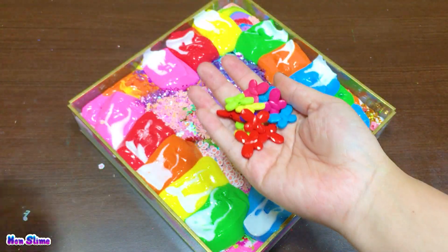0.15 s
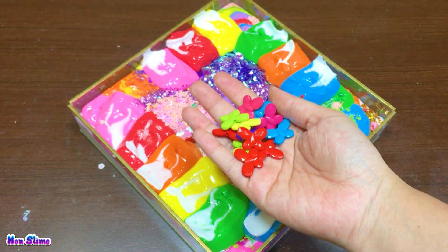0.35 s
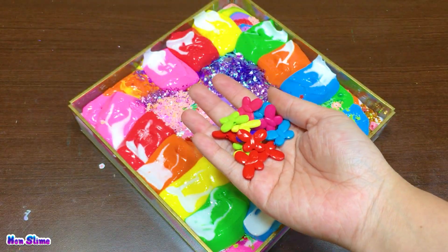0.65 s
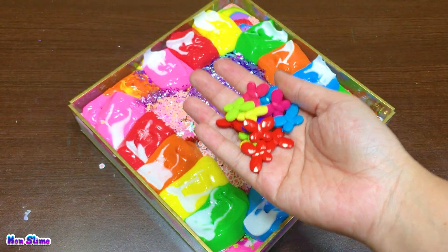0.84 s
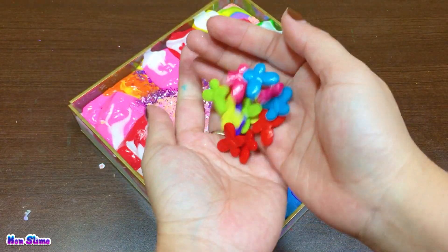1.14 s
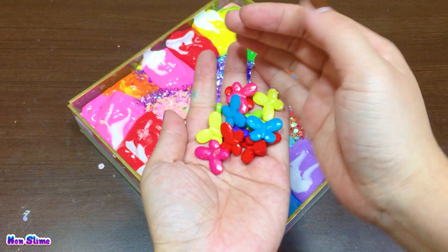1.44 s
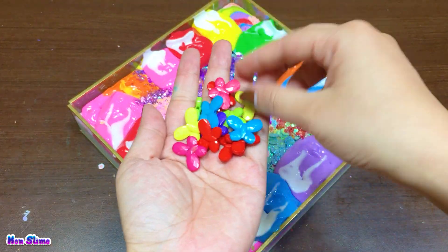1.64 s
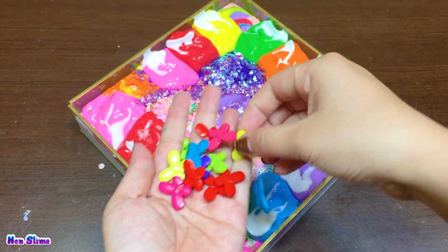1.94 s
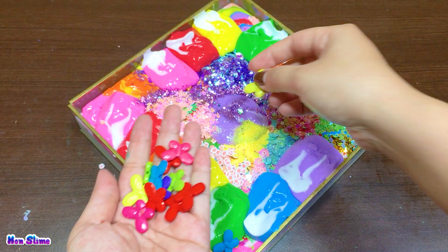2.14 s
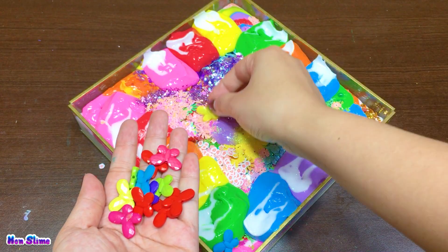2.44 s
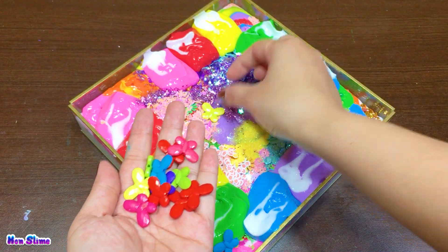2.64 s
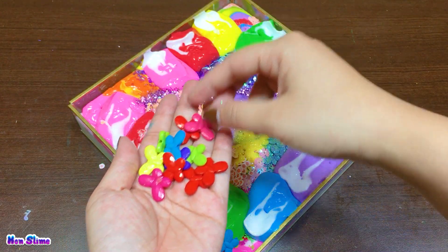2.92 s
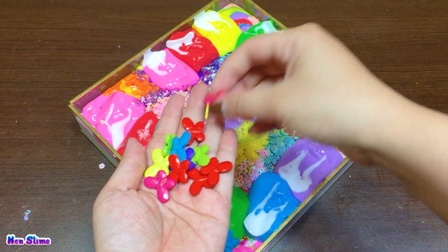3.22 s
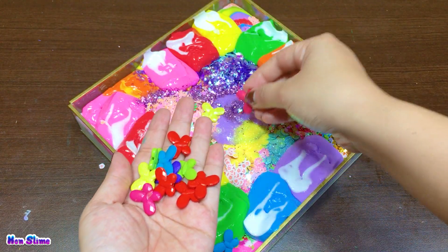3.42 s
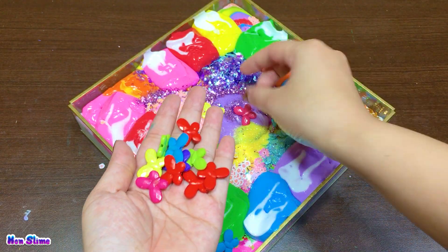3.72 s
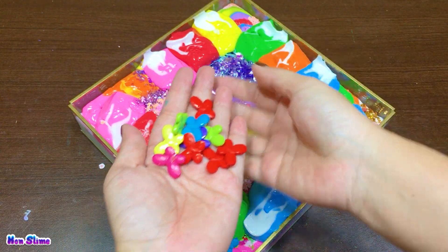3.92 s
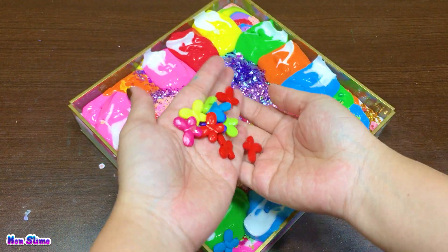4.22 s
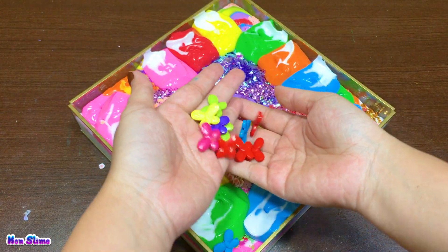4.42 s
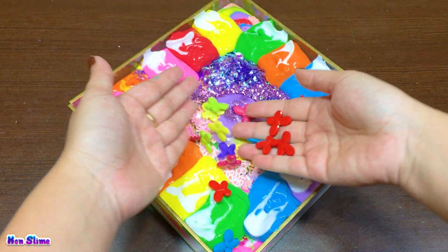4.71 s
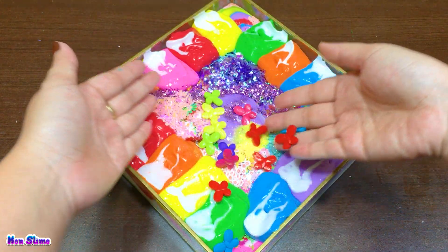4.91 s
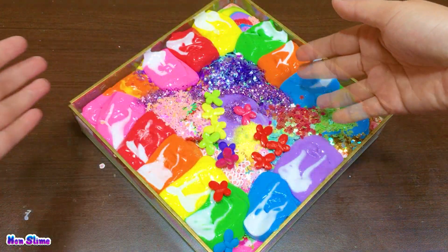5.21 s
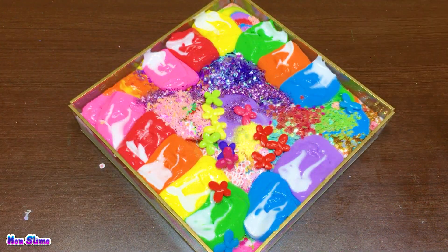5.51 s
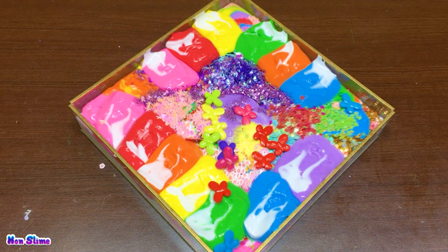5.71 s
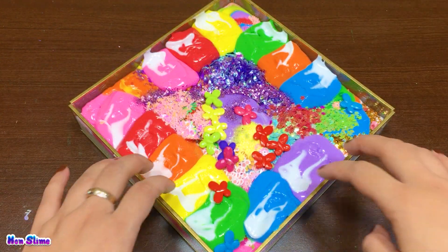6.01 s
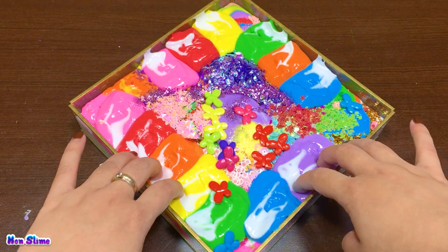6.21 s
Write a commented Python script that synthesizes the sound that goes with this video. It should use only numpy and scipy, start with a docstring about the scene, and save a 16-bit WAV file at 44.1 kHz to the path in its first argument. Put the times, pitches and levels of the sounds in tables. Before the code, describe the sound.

Close up, a jar thumps on wood, bright beads clatter in hands, a tray clacks sharply, and beads patter down into slime.

```python
"""Plastic beads, a jar and slime

A plastic jar slides and is knocked down on a wooden table beside a tray of slime: scrapes, damped rings and thumps.
Plastic butterfly beads are tipped from palm to palm, picked out one by one and poured onto the slime:
short ringing clicks, a dense patter and sticky pops. One sharp clack of the tray rings out.
A soft hiss swells slowly and drops off quickly, and hands rumble dully as they shift, both as shaped noise,
in a small room with a wavering hum."""
import sys
import numpy as np
from scipy import signal
from scipy.fft import rfft, irfft, next_fast_len
from scipy.io import wavfile
from scipy.ndimage import map_coordinates

SR = 44100
rng = np.random.default_rng(int(sys.argv[2]) if len(sys.argv) > 2 else 0)


def to_wav(s):
    """Save 16-bit WAV."""
    ch = np.atleast_2d(s).T  # columns
    pcm = np.round(np.clip(ch, -1, 1) * 32767)  # PCM
    wavfile.write(sys.argv[1], SR, pcm.astype(np.int16))


N = 280035  # length in samples

# Colour of the room tone. Each row: frequency in Hz, relative density in dB per Hz.
AIR_COLOUR = [(20, -31), (32, -15.5), (50, 3), (80, -8.5), (120, -7), (170, -8), (215, 1), (270, -9),
              (320, -5.5), (490, -17), (1100, -26), (2000, -27), (6200, -31), (16000, -39.5)]
# Hum of a fan. Each row: frequency in Hz, level in dB before the trim in room_tone().
FAN_HUM = [(53.8, -69), (107.7, -70.5), (161.5, -69), (209.9, -72), (317.6, -71.5)]
# How long the room rings. Each row: frequency in Hz, time to fall 60 dB in seconds.
ROOM_DECAY = [(120, .4), (350, 0.429), (650, 0.28), (1200, 0.3), (3000, 0.11), (8000, 0.098), (16000, 0.27)]

# Soft hiss that swells and drops off. Each row: start in seconds, hold in seconds, level in dB before the lift in hiss().
HISS_SWELLS = [(1.22, .5, -61), (3.92, .6, -73.5), (4.66, .58, -63), (5.84, .26, -73), (6.15, .2, -66.5)]
# Colour of that hiss. Each row: frequency in Hz, relative density in dB per Hz.
HISS_COLOUR = [(200, -3), (600, 2), (2000, 0.5), (4000, -1), (8000, -4), (15000, -11)]
# Dull rumble as the hands shift and grip the tray. Each row: start in seconds, hold in seconds, level in dB.
HAND_LEANS = [(4.75, 0.43, -57.5), (5.88, 0.73, -57)]
# Colour of that rumble. Each row: frequency in Hz, relative density in dB per Hz.
RUMBLE_COLOUR = [(30, -7), (80, -5.5), (115, 0), (170, -1.5), (240, -5.5), (350, -27), (600, -37),
                 (2000, -67)]

# Beads are pressed into the slime. Each row: start in seconds, hold in seconds, level in dB.
SLIME_PRESSES = [(2.52, 0.11, -63.5), (3.71, 0.0085, -61.5)]
# A bead drops into soft slime. One row: start in seconds, peak in dB, pitch in Hz.
SLIME_PLOP = (4.968, -40, 2120)

# Hard plastic clacks on the tray. Each row: start in seconds, level in dB before the balance of tone and snap.
TRAY_CLACKS = [(2.109, -13), (5.321, -42), (5.6505, -42.5), (6.329, -45)]
# Modes of the tray. Each row: frequency in Hz, relative level in dB, time to fall 60 dB in seconds.
TRAY_MODES = [(1450, -4.5, 0.0067), (2120, 9.5, 0.0046), (3340, -25, 0.0019)]
# Filter for a clack's noisy part. Each row: frequency in Hz, gain in dB.
SNAP_COLOUR = [(50, -30.5), (170, -1), (450, -10), (750, -10.5), (1400, -6), (2600, 0), (4200, 1),
               (5200, -6), (7000, -3.5), (11000, -15), (16000, -19)]

# The jar meets the table. Each row: start in seconds, ring pitch in Hz, ring's time to fall 60 dB in seconds,
# ring peak in dB, table peak in dB, crack peak in dB before its filter.
JAR_KNOCKS = [(0.4891, 1131, 0.0074, 0.5, -17, 4), (.495, 1056, 0.015, -9, -30.5, -20),
              (0.6473, 1008, 0.035, -20.5, -29, -20), (0.7212, 1260, 0.0027, -16, -16, -9.5),
              (0.7362, 1130, 0.0086, -18, -34, -21)]
# Modes of the wooden table. Each row: frequency in Hz, relative level in dB, time to fall 60 dB in seconds.
TABLE_MODES = [(116, -28, 0.22), (254, -23, .05), (402, -7, .025), (600.6, 1.5, 0.022), (706, -6, 0.017)]
# Filter for the jar's crack. Each row: frequency in Hz, gain in dB.
SHELL_COLOUR = [(60, -24), (300, -12.5), (600, -4), (1200, -6.5), (1750, 6), (2200, -5), (4500, -12.5),
                (7000, -22), (16000, -36.5)]
# The jar is pushed over the table. Each row: start in seconds, hold in seconds, level in dB before its flutter.
JAR_SLIDES = [(.15, 0.086, -58.5), (.32, .06, -65), (.44, 0.032, -51.5)]
# Colour of the scrape. Each row: frequency in Hz, relative density in dB per Hz.
SCRAPE_COLOUR = [(300, -25.5), (900, -9.5), (1550, 0), (2100, -12), (3000, -18), (5500, -14.5), (9000, -23),
                 (16000, -31)]

# Bead against bead, the clearest contacts. Each row: time in seconds (the click follows 1 ms later),
# nominal peak in dB before the bass cut, nominal pitch in Hz of the mode struck hardest.
BEAD_CLICKS = [(0.7885, -38.5, 7440), (1.1134, -29, 15050), (1.1607, -21, 7190), (1.2069, -16.5, 15200),
               (1.2419, -8, 15000), (1.2473, -4.5, 15100), (1.2556, -13, 10600), (1.28, -13, 15000),
               (1.3171, -9, 10600), (1.3418, -14, 6150), (1.3559, -7.5, 15200), (1.3893, -28, 11600),
               (1.4197, -23, 11100), (1.5463, -35, 12300), (1.7834, -22.5, 15100), (1.8179, -30, 9250),
               (1.8252, -21, 15400), (1.8605, -33, 7030), (1.9784, -34.5, 6600), (2.0033, -20.5, 15150),
               (2.0647, -24.5, 10660), (2.6365, -43.5, 15310), (2.9926, -34, 6900), (3.1757, -47.5, 15300),
               (4.1628, -38, 9680), (4.321, -32, 11100), (4.4304, -20.5, 15350), (4.4709, -19.5, 10000),
               (4.4974, -24, 6010), (4.5227, -22.5, 7100), (4.556, -19, 8750), (4.5874, -16.5, 10570),
               (4.6332, -16.5, 15400), (4.6398, -16.5, 15800), (4.6476, -19, 15300), (4.6683, -11, 14300),
               (4.681, -21.5, 15200), (4.7007, -19, 15300), (4.7396, -18.5, 14800), (4.7661, -22.5, 14900),
               (4.809, -24, 15000), (4.8657, -16, 15100), (4.9477, -26, 12000), (5.0442, -28.5, 10500)]
# Modes of a bead. Each row: frequency in Hz, relative level in dB, time to fall 60 dB in seconds.
BEAD_MODES = [(3460, -15.5, 0.005), (6210, -7.5, 0.0018), (7280, 0, 0.0025), (9520, 9, 0.0013),
              (11230, 0.5, 0.0033), (12300, -24.5, 0.0026), (14760, -2.5, 0.0048)]
# Beads shift and tumble in the palm. Each row: start in seconds, hold in seconds, level in dB before the lift in beads().
BEAD_JOSTLES = [(1.15, 0.062, -49), (1.245, 0.12, -32), (1.77, .29, -64.5), (3.94, .28, -76),
                (4.38, .04, -58), (4.45, 0.18, -45), (4.66, 0.036, -50.5), (4.74, 0.035, -52),
                (4.81, 0.1, -59.5)]

PATTER_RANGE_DB = 28  # spread between the strongest and the weakest small contacts
REBOUND_GAP_S = (0.0011, 0.006)  # shortest and longest step between rebounds, counted from the listed time
REBOUND_FIRST_DB, REBOUND_LOSS_DB = -8, 4.5  # first rebound against the listed peak; loss at each further one
# The room's low notes build up late after a thump on the table.
BOOM_BAND_HZ, BOOM_DB, BOOM_BUILD_S = (180, 350), -5.5, 0.046
TOP_HZ = 16100  # the recorder's band limit


def amp(db):
    """Decibels to gain."""
    return 10 ** (np.asarray(db) / 20)


def unit(x):
    """x at rms 1."""
    return x / np.sqrt(np.mean(x ** 2) + 1e-20)


def along(points, hz):
    """Values between (Hz, value) points on a log axis."""
    f, v = np.transpose(points)
    return np.interp(np.log(hz + 1), np.log(f + 1), v)


def swell(strokes, attack_s, release_s):
    """Gain per sample: each stroke gains 20 dB per attack_s, holds, and loses 20 dB per release_s."""
    t = np.arange(N) / SR
    levels = []
    for s, hold, db in strokes:
        rising = (s - t) / attack_s
        falling = (t - s - hold) / release_s
        levels.append(db - 20 * np.maximum(np.maximum(rising, falling), 0))
    loudest = np.max(levels, axis=0)
    return amp(np.maximum(loudest, -140))


def wobble(rate):
    """A smooth random curve, rate knots a second."""
    knots = rng.standard_normal(int(N * rate / SR) + 4)
    return map_coordinates(knots, [np.arange(N) * rate / SR])


def filtered(x, response):
    """x times a response of frequency."""
    m = next_fast_len(N + 8192)
    spectrum = rfft(x, m) * response(np.fft.rfftfreq(m, 1 / SR))
    return irfft(spectrum, m)[:N]


def coloured(x, colour):
    """x through a filter drawn in dB over Hz."""
    return filtered(x, lambda hz: amp(along(colour, hz)))


def noise(colour):
    """Coloured noise of rms 1."""
    return unit(coloured(rng.standard_normal(N), colour))


def add(track, s, sound):
    """Mix a sound into the track at time s."""
    start = int(np.clip(round(s * SR), 0, N - 1))
    track[start:start + len(sound)] += sound[:N - start]


def ring(modes, t, attack, scatter_db, detune):
    """Damped modes with peak 1; scatter_db and detune vary their levels and pitches at random."""
    hz, db, t60 = np.transpose(modes)[:, :, None]
    strength, shift = rng.standard_normal((2, len(modes), 1))
    decay = amp(db + scatter_db * strength - 60 * t / t60)
    waves = decay * np.sin(2 * np.pi * hz * np.exp(detune * shift) * t)
    sound = waves.sum(0) * (1 - np.exp(-t / attack))
    return sound / np.abs(sound).max()


def crack(t, t60):
    """The noisy instant of contact, with peak 1."""
    burst = rng.standard_normal(len(t)) * amp(-60 * t / t60)
    return burst / np.abs(burst).max()


def room(x, gap):
    """The room's answer: a noise tail that fades in over the gap, each band dying at its own rate."""
    hz, t, z = signal.stft(rng.standard_normal(SR // 2), SR, nperseg=256)
    decay = amp(-60 * t / along(ROOM_DECAY, hz)[:, None])
    tail = signal.istft(z * decay, SR, nperseg=256)[1]
    tail = tail * (1 - np.exp(-(np.arange(len(tail)) / SR / gap) ** 2))
    return signal.fftconvolve(x, tail / np.linalg.norm(tail))[:N]


def room_tone():
    """Low rumble and faint hiss from shaped noise, and a fan hum of sines unsteady in level and phase."""
    t = np.arange(N) / SR
    hum = np.zeros(N)
    for hz, db in FAN_HUM:
        level = amp(db + 1.1 * wobble(3.087)) * np.sqrt(2)  # a sine peaks 3 dB over its rms
        hum += level * np.sin(2 * np.pi * hz * t + 0.82 * wobble(7.4))
    return amp(-60.0) * noise(AIR_COLOUR) + amp(-1.5) * hum


def hiss():
    """A soft, slightly fluttering hiss of shaped noise that swells slowly and drops off quickly."""
    flutter = amp(0.7 * wobble(25))
    return amp(2.5) * swell(HISS_SWELLS, attack_s=0.4, release_s=0.062) * noise(HISS_COLOUR) * flutter


def hands():
    """A dull rumble of shaped noise as the hands shift and grip the tray."""
    return swell(HAND_LEANS, attack_s=0.21, release_s=0.22) * noise(RUMBLE_COLOUR)


def slime():
    """Tiny sticky pops, random impulses where beads are pressed in, and one soft plop, a short damped tone."""
    pops = rng.standard_normal(N) * (rng.random(N) < 700 / SR)  # about 700 a second
    pops = unit(coloured(pops, [(1000, -26.0), (6000, -11), (16000, -10)]))
    out = swell(SLIME_PRESSES, attack_s=0.063, release_s=0.035) * pops
    s, db, hz = SLIME_PLOP
    t = np.arange(SR // 16) / SR
    add(out, s, amp(db) * ring([(hz, 0, 0.012)], t, attack=0.0021, scatter_db=0, detune=0))
    return out


def tray():
    """Sharp clacks of stiff plastic: damped modes and a noisy snap that carries into the room."""
    tone, snap = np.zeros((2, N))
    t = np.arange(SR // 16) / SR
    for s, db in TRAY_CLACKS:
        add(tone, s, amp(db - 11) * ring(TRAY_MODES, t, attack=0.0008, scatter_db=2.5, detune=0.034))
        add(snap, s, amp(db + 6.5) * crack(t, t60=0.019))
    snap = coloured(snap, SNAP_COLOUR)
    return tone + snap + amp(-9.5) * room(snap, gap=0.0065)


def jar():
    """The jar scrapes along, lands, rocks and settles; pitch depends on where it touches, each blow thumps the table."""
    shell, cracks, wood = np.zeros((3, N))
    t = np.arange(SR // 4) / SR
    for s, hz, t60, ring_db, table_db, crack_db in JAR_KNOCKS:
        add(shell, s, amp(ring_db) * ring([(hz, 0, t60)], t, attack=0.0012, scatter_db=0, detune=0))
        add(cracks, s, amp(crack_db) * crack(t, t60=0.014))
        add(wood, s, amp(table_db) * ring(TABLE_MODES, t, attack=0.0026, scatter_db=2.0, detune=0.033))
    cracks = coloured(cracks, SHELL_COLOUR)
    flutter = amp(2.4 * wobble(90))
    scrape = swell(JAR_SLIDES, attack_s=0.097, release_s=0.04) * noise(SCRAPE_COLOUR) * flutter
    # the ring points at the microphone, while crack and thump spread into the room
    echo = amp(-10.5) * room(shell, gap=0.0067)
    echo += amp(-4) * room(cracks, gap=0.0027)
    echo += amp(-8.0) * room(wood, gap=0.01)
    boom_filter = signal.butter(2, BOOM_BAND_HZ, "bandpass", fs=SR, output="sos")
    boom = amp(BOOM_DB) * room(signal.sosfilt(boom_filter, wood), gap=BOOM_BUILD_S)
    return shell + cracks + wood + scrape + echo + boom


def bead_click(t, hz):
    """One contact: the beads' short modes, an extra one ringing near hz, and a noisy crack, with peak 1."""
    body = ring(BEAD_MODES, t, attack=0.0001, scatter_db=0, detune=0.08)
    struck = ring([(hz, 0, 0.003)], t, attack=0.0001, scatter_db=0, detune=0.008)
    click = body + amp(-2.5) * struck + amp(-8.5) * crack(t, t60=0.0041)
    return click / np.abs(click).max()


def bead_clicks(t):
    """Clear clicks that chatter on in three weaker rebounds."""
    clicks = np.zeros(N)
    for s, db, hz in BEAD_CLICKS:
        add(clicks, s + 0.001, amp(db - 0.1) * bead_click(t, hz))
        delays = np.cumsum(rng.uniform(*REBOUND_GAP_S, size=3))
        for k, delay in enumerate(delays):
            rebound_db = db + REBOUND_FIRST_DB - REBOUND_LOSS_DB * k
            add(clicks, s + delay, amp(rebound_db) * bead_click(t, hz))
    return clicks


def bead_patter(t):
    """A dense, even patter of small contacts at random moments and strengths."""
    patter = np.zeros(N)
    moments = rng.uniform(0, (N - 1) / SR, size=4200)
    drops_db = rng.uniform(-PATTER_RANGE_DB, 0, len(moments))
    pitches = rng.choice(np.transpose(BEAD_MODES)[0][1:], size=64)  # any mode but the lowest
    shapes = np.array([bead_click(t, hz) for hz in pitches])
    for s, drop_db, shape in zip(moments, drops_db, rng.choice(shapes, len(moments))):
        add(patter, s, amp(drop_db) * shape)
    return patter


def beads():
    """Clear clicks over a patter that swells as the beads tumble, with a faint answer from the room."""
    t = np.arange(SR // 80) / SR
    tumble = amp(18.0) * swell(BEAD_JOSTLES, attack_s=0.048, release_s=0.04)
    out = bead_clicks(t) + tumble * bead_patter(t)
    # beads are too small to radiate low notes
    out = signal.sosfilt(signal.butter(1, 1800, "highpass", fs=SR, output="sos"), out)
    return out + amp(-15) * room(out, gap=0.0015)


def scene():
    """Everything at one close microphone."""
    return (room_tone() + hiss() + hands() + slime() + tray() + jar() + beads())[None]


def record(dry):
    """The recorder thins the deep bass, clips at full scale and cuts steeply above its band limit."""
    thin = signal.sosfilt(signal.butter(2, 36, "highpass", fs=SR, output="sos"), dry[0])
    clipped = np.clip(thin, -1, 1)
    return filtered(clipped, lambda hz: 1 / np.sqrt(1 + (hz / TOP_HZ) ** 120))[None]


dry = scene()
out = record(dry)
to_wav(out)
```